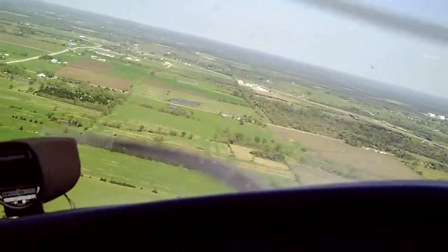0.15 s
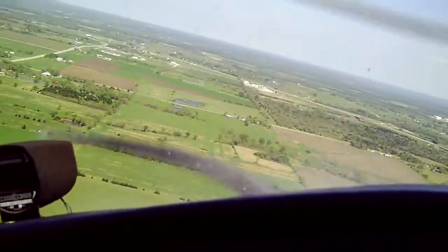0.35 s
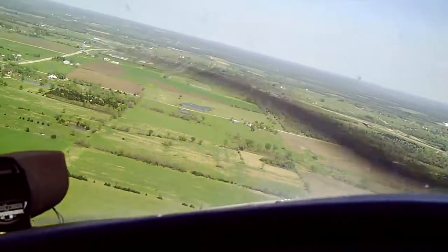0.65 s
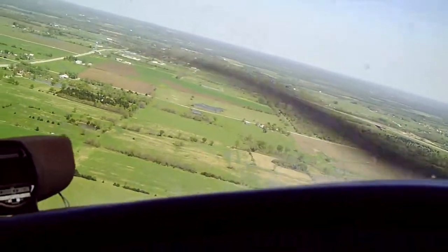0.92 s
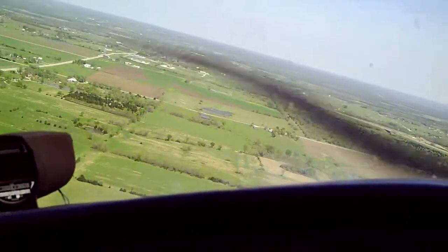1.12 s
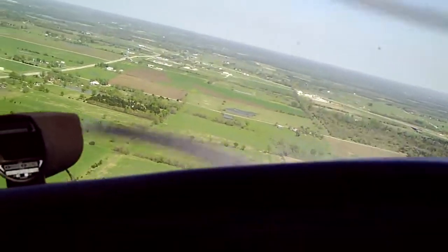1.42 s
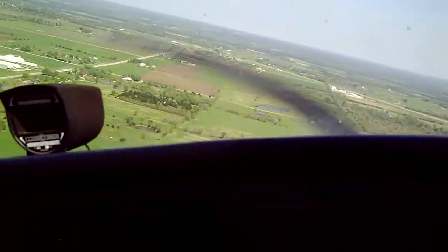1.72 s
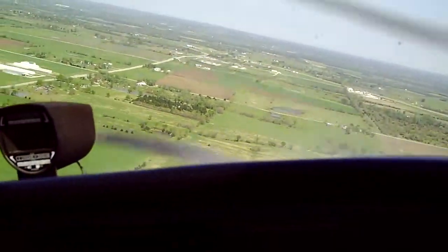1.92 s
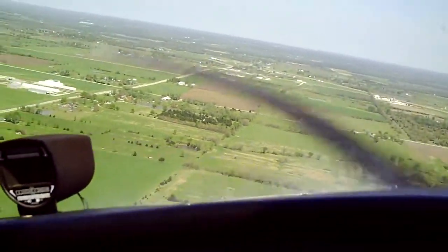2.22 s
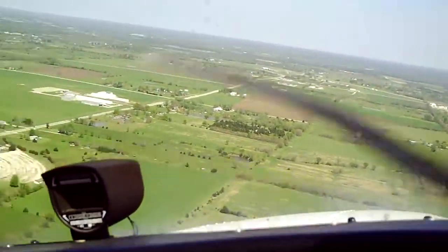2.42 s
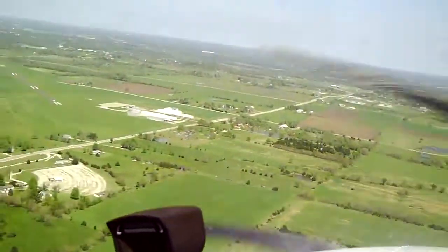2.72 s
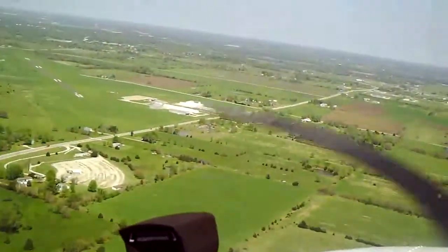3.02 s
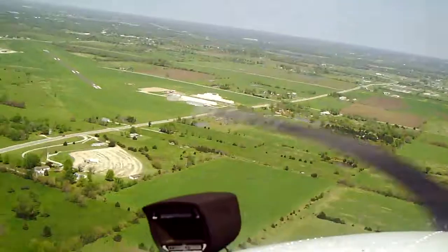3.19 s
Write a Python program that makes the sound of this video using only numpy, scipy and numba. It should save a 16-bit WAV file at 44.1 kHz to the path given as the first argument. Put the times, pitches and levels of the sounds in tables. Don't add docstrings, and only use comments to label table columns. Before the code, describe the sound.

A small propeller plane's engine drones loudly in the cabin over rushing wind and buffeting

```python
import sys
import numpy as np
from scipy import signal
from scipy.fft import rfft, irfft, next_fast_len
from scipy.io import wavfile
from scipy.ndimage import uniform_filter1d
from numba import njit

SR = 44100
rng = np.random.default_rng(int(sys.argv[2]) if len(sys.argv) > 2 else 0)


def natural_amplitude(level_db):
    exponent = np.asarray(level_db, float) / 20
    return 10 ** exponent


def wrap_up_sound(samples):
    columns = np.atleast_2d(samples).T
    tamed = np.clip(columns, -1, 1)
    steps = np.round(tamed * 32767).astype(np.int16)
    wavfile.write(sys.argv[1], SR, steps)


N = 147735


def level(x, rms_db):
    return x * natural_amplitude(rms_db) / np.sqrt(np.mean(x ** 2))


def curve(table, column):
    rows = np.array(table, float)
    return np.interp(np.arange(N) / SR, rows[:, 0], rows[:, column])


def walk(rate_hz):
    hold = int(SR / rate_hz)
    held = np.repeat(rng.standard_normal(1500), hold)[:N]
    return 1.18 * uniform_filter1d(uniform_filter1d(held, hold), hold)


@njit
def svf(x, hz, width_hz):
    y, band, low = np.empty(len(x)), 0., 0.
    for i in range(len(x)):
        g, damping = np.tan(np.pi * hz[i] / SR), width_hz / hz[i]
        v = (band + g * (x[i] - low)) / (1 + g * (g + damping))
        band = 2 * v - band
        low = low + 2 * g * v
        y[i] = damping * v
    return y


def noise_band(hz, width_hz):
    return svf(rng.standard_normal(N), np.full(N, 1.0) * hz, float(width_hz))


def turbulence(colour, rms_db, shared_db, own_db, rate_hz):
    size = next_fast_len(N)
    f = np.arange(size // 2 + 1) * SR / size + 1e-3
    rows = np.array(colour, float)
    shape_db = np.interp(np.log(f), np.log(rows[:, 0]), rows[:, 1], left=-90)
    shape_db[f > 1.15 * rows[-1, 0]] = -90
    spectrum = rfft(rng.standard_normal(size)) * natural_amplitude(shape_db)
    third = 3 * np.log2(f)
    first, last = (int(3 * np.log2(rows[i, 0])) for i in (0, -1))
    together_db = shared_db * walk(rate_hz)
    out = 0
    for k in range(first, last + 3):
        part = np.cos(np.pi / 2 * np.clip(third - k, -1, 1)) ** 2
        out = out + irfft(spectrum * part, size)[:N] * natural_amplitude(together_db + own_db * walk(rate_hz))
    return level(out, rms_db)


# time in seconds, shaft speed in Hz.
SHAFT_HZ = [(0.0, 45.21), (0.37, 46.1), (2.43, 45.74), (2.77, 44.63), (2.99, 43.42), (3.27, 42.8),
            (3.35, 43.7)]
# time in seconds, load in dB, mount shake in dB, exhaust boom in dB.
PATHS_DB = [(0, -2, -3, -5.5), (.25, -3.5, -6.5, -3.5), (.5, 0, -2.5, -9), (.7, -4, 11.5, -5.5),
            (.95, 2, 5, -1), (1.2, -2, 2.5, 0), (1.5, -1, -3.5, 0.5), (1.7, 2.5, 6, 3),
            (2.0, -0.5, -1, -0.5), (2.3, -0.5, 3, -5), (2.45, 0.5, 10.5, -8.5), (2.62, 2, 1.5, -7),
            (2.85, -3.5, -0.5, -2.5), (3.1, -1, 6, -3.5), (3.35, -1.5, -9, -7)]
# multiple of shaft speed, level in dB, shares of load, shake, boom.
ORDERS = [(.5, -20, .5, -0.19, 0.21), (1, -18.5, .2, 0.85, -0.073), (2, -14, 0.94, -0.066, 0.18),
          (2.5, -32.5, .3, 0.6, 0.47), (3, -19, 0.39, -0.13, -0.22), (4, -21.5, 0.36, -0.39, 1),
          (4.5, -34.5, .1, 1, 0.58), (5, -29.5, .1, 0.044, -0.4), (7, -39, 0.72, -1.2, 0.52),
          (8, -33.5, 0.61, -0.6, .3), (12, -40.5, .5, 0.61, -0.3)]
CYCLE_JITTER = 0.0032
WANDER_DB, UNEVEN_DB = 1.53, 2.1
SPREAD_TURNS, SLIP_TURNS = 0.14, 0.14


def engine():
    shaft_hz = curve(SHAFT_HZ, column=1) * (1 + CYCLE_JITTER * walk(12.12))
    turns = np.cumsum(shaft_hz) / SR
    load, shake, boom = (curve(PATHS_DB, column=c) for c in range(1, 4))
    out = 0
    for order, db, load_share, shake_share, boom_share in ORDERS:
        path_db = load_share * load + shake_share * shake + boom_share * boom
        wander_db = (WANDER_DB + UNEVEN_DB * (order % 1 > 0)) * walk(6)
        slip = SLIP_TURNS / order ** 2 * walk(3.3)
        phase = order * turns + SPREAD_TURNS * order ** 2 + slip
        out = out - np.sqrt(2) * natural_amplitude(db + path_db + wander_db) * np.cos(2 * np.pi * phase)
    return out


# time in seconds, buffet in dB.
GUSTS_DB = [(0.0, -33), (0.19, -5.5), (0.32, -35), (0.37, -15), (0.53, -10), (0.76, -18), (0.81, -5),
            (0.94, -22.5), (1.4, -15), (1.46, -5), (1.65, -32), (1.97, -7.5), (2.01, -17), (2.55, -10.5),
            (2.62, -15.5), (2.67, -12.5), (3.2, -11.5), (3.35, -35)]
# frequency in Hz, density in dB per Hz.
RUMBLE_COLOUR = [(30, -3), (50, -2.5), (70, -8.5), (112, -8), (155, -10.5), (210, -16), (350, -17.5),
                 (460, -27)]
BUFFET_HZ, BUFFET_WIDTH_HZ, BUFFET_DB = 20.76, 15, -0.06


def airframe():
    hz = np.full(N, BUFFET_HZ)
    shake = svf(noise_band(hz, BUFFET_WIDTH_HZ), hz, 2.0 * BUFFET_WIDTH_HZ)
    shake = shake / np.sqrt(uniform_filter1d(shake ** 2, size=8000))
    rumble = turbulence(RUMBLE_COLOUR, rms_db=-15, shared_db=0.13, own_db=0.37, rate_hz=6.36)
    return shake * natural_amplitude(curve(GUSTS_DB, column=1) + BUFFET_DB) + rumble


# time in seconds, air in dB.
AIR_DB = [(0, 1.5), (.4, 0.5), (.8, 1), (1.2, -0.5), (1.5, 1), (1.75, 1), (2.1, 1), (2.35, 0), (2.7, -1),
          (3.0, -1), (3.35, 0)]
# frequency in Hz, density in dB per Hz.
ROAR_COLOUR = [(300, 5), (460, -6), (620, 2), (900, -3.5), (1020, -4), (1450, -3), (1750, -12), (2600, -26)]
# frequency in Hz, density in dB per Hz.
HISS_COLOUR = [(1800, -6), (2600, -2), (3300, 0), (3800, -9), (6000, -10), (9400, -7.5), (10900, -20),
               (12400, -24.5)]
# pitch in Hz, width in Hz, level in dB.
SEAL_WHISTLES = [(2218, 52, -48.5), (3277, 96, -47.5), (5000, 300, -50), (6580, 560, -48.5),
                 (8470, 580, -46)]
# time in seconds, pitch in Hz, level in dB.
LEAK_WHISTLE = [(0, 2860, -53), (1.1, 2770, -41), (1.6, 2894, -38), (2.2, 2830, -43.5), (2.6, 3028, -49),
                (3.35, 3090, -46)]
LEAK_WIDTH_HZ = 91


def slipstream():
    air_db = curve(AIR_DB, column=1)
    roar = turbulence(ROAR_COLOUR, rms_db=-24, shared_db=0.22, own_db=0.83, rate_hz=14)
    hiss = turbulence(HISS_COLOUR, rms_db=-34, shared_db=0.54, own_db=0.5, rate_hz=30.12)
    seals = hiss * natural_amplitude(0.82 * walk(150))
    for hz, width_hz, db in SEAL_WHISTLES:
        whistle = noise_band(hz * (1 + 0.0047 * walk(2.44)), width_hz)
        seals = seals + level(whistle, db) * natural_amplitude(1.5 * walk(27.83))
    leak_hz = curve(LEAK_WHISTLE, column=1) * (1 + 0.002 * walk(6.2))
    leak_db = curve(LEAK_WHISTLE, column=2) + 1.4 * walk(13.2)
    leak = level(noise_band(leak_hz, LEAK_WIDTH_HZ), 0) * natural_amplitude(leak_db)
    return roar * natural_amplitude(0.69 * air_db) + seals * natural_amplitude(air_db) + leak


# frequency in Hz, width in Hz, level in dB.
PANEL_MODES = [(670, 80, -41.5), (870, 33, -36), (1090, 38, -37), (1300, 43, -42), (1467, 24, -39.5)]


def skin_panels():
    out = 0
    for hz, width_hz, db in PANEL_MODES:
        hum = noise_band(hz * (1 + 0.021 * walk(4.87)), width_hz)
        out = out + level(hum, db) * natural_amplitude(0.75 * walk(16))
    return out


# start in seconds, level in dB.
STRIP_TICKS = [(0.0822, -41), (0.169, -41), (0.2793, -35), (0.6331, -36), (0.7976, -41), (0.8874, -39),
               (0.9927, -37), (1.1363, -34), (1.267, -36), (1.3518, -35), (1.562, -31), (1.9135, -34),
               (2.1417, -35), (2.2328, -50), (2.6878, -35), (2.9327, -38)]
TICK_HZ, TICK_WIDTH_HZ, TICK_S, TICK_DB = 6540, 210, 0.0075, -6


def trim_strip():
    t = np.arange(N) / SR
    swell = 0
    for start, db in STRIP_TICKS:
        swell = swell + natural_amplitude(db + TICK_DB) * np.exp(-((t - start - TICK_S) / TICK_S) ** 2)
    return level(noise_band(TICK_HZ, TICK_WIDTH_HZ), 0) * swell


def scene():
    return (engine() + airframe() + slipstream() + skin_panels() + trim_strip())[None, :]


def roll_off(x):
    return signal.sosfilt(signal.butter(12, 13650, fs=SR, output="sos"), x)


MIC_TOP_HZ = 12500
CLIP_AT, KNEE = 0.964, 24


def record(dry):
    x = signal.sosfilt(signal.butter(8, MIC_TOP_HZ, fs=SR, output="sos"), dry)
    clipped = x / (1 + np.abs(x / CLIP_AT) ** KNEE) ** (1 / KNEE)
    return roll_off(clipped)


dry = scene()
out = record(dry)
wrap_up_sound(out)
```